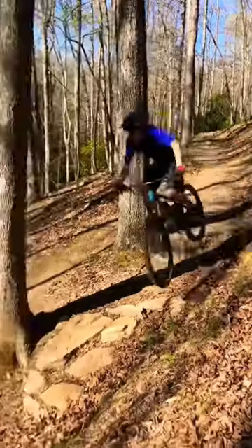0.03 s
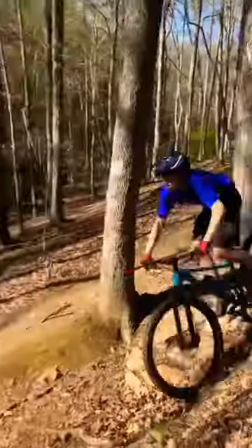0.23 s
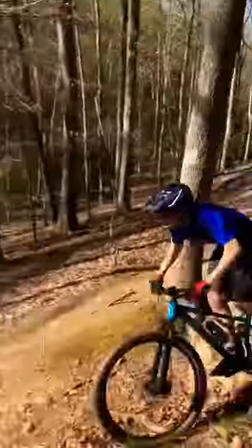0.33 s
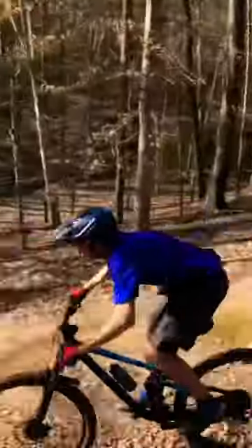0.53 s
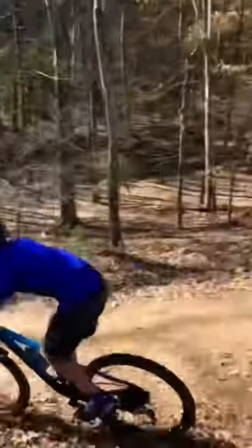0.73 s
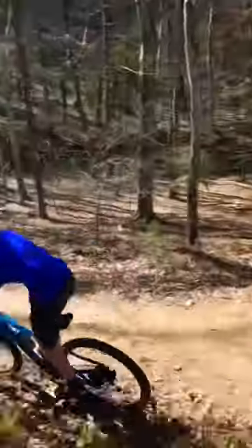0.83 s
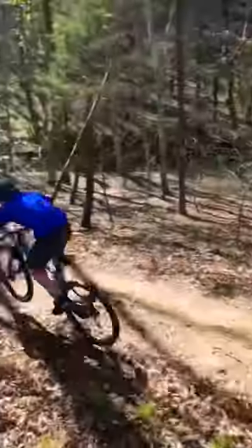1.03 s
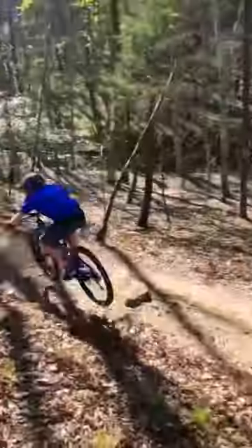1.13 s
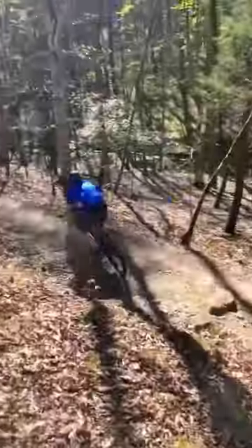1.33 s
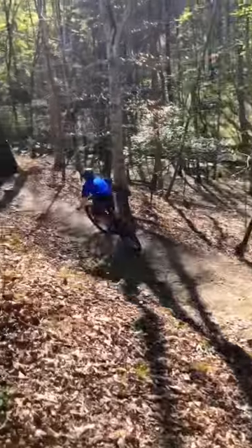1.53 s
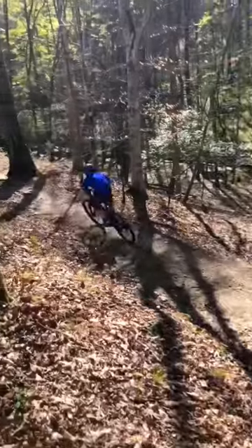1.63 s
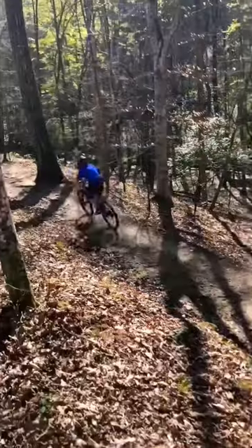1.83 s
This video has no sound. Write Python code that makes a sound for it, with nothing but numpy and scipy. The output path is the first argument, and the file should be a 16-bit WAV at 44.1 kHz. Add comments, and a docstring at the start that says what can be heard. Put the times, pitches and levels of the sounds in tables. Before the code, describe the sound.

A mountain bike ticks briefly in the air, lands with a thud and rushes close past, its tyres crunching through dry leaves and twigs. The frame knocks and the chain slaps, then it fades through a quiet wood, freehub buzzing.

```python
"""A mountain bike comes off a drop in a quiet wood, its freehub pawls ticking as the rear wheel spins.
At about 0.25 s it lands in dry leaves: the wheels thud, the tyres boom and the frame knocks.
It rushes past on a dirt trail, the tyres tearing through litter and grit, droning and snapping twigs,
while the chain slaps and the trees scatter a thin echo. From about 1 s it rides away through a bend,
duller and fainter, the freehub buzzing."""
import sys
import numpy as np
from scipy import signal
from scipy.fft import rfft, irfft, next_fast_len
from scipy.io import wavfile
from scipy.ndimage import map_coordinates

SR = 44100
rng = np.random.default_rng(int(sys.argv[2]) if len(sys.argv) > 2 else 0)


def master(y):
    """Save y as 16-bit WAV."""
    cut = np.clip(np.atleast_2d(y).T, -1, 1)
    pcm = np.round(cut * 32767)  # scale
    wavfile.write(sys.argv[1], SR, pcm.astype(np.int16))


N = 83790
T = np.arange(N) / SR

# Spectra of the noise sources. Each row: frequency in Hz, relative spectral density in dB.
WOOD_SPECTRUM = [(30, -51), (160, -0.5), (300, -20.5), (600, -2), (1200, -6.5), (2800, -14.5), (5000, -20),
                 (15000, -25)]
RUMBLE_SPECTRUM = [(20, -28), (40, -11.5), (60, -2.5), (90, -3.5), (130, -11.5), (220, -44), (800, -86)]
TICK_SPECTRUM = [(800, -3), (2200, -2), (2800, 2), (3600, 0), (5000, -6.5), (6600, -3), (7200, -3),
                 (8000, -3), (9200, -4), (13000, -3), (14200, 1), (16000, -4.5)]
BUZZ_SPECTRUM = [(1500, -9), (2800, -3), (4300, 8), (6000, 0.5), (8000, 2), (10000, 0), (12000, 2),
                 (13400, 8), (14300, -8), (15500, 7)]
DRONE_SPECTRUM = [(60, -12), (130, -6), (190, -3), (240, -5), (300, -3), (350, -11), (450, -14.5),
                  (900, -17.5), (4000, -92)]
LEAF_SPECTRUM = [(400, -8), (1200, -3), (2500, -2.5), (4000, -1), (7500, -0.5), (11000, -1), (15500, -3.5)]
NEAR_SOIL_SPECTRUM = [(200, -5), (500, -11.5), (780, 6), (1000, -1.5), (1250, -5), (1600, -1), (2600, -9),
                      (5000, -1), (15000, -45)]
FAR_SOIL_SPECTRUM = [(200, -40), (420, -16), (630, 3), (880, -8.5), (1130, 1.5), (1450, -5.5), (2200, -4),
                     (5000, -18), (15000, -48)]

# Envelopes of the sustained sounds. Each row: time in seconds, relative level in dB.
RUMBLE_LEVELS = [(0, -58), (.22, -70), (.3, -41), (.42, -33.5), (.49, -37.5), (.56, -47), (.65, -54),
                 (.75, -47.5), (.97, -47), (1.08, -51), (1.28, -59), (1.34, -50), (1.55, -55), (1.9, -60.5)]
DRONE_LEVELS = [(0, -52), (.22, -57.5), (.25, -45.5), (.37, -32.5), (.46, -40), (.7, -49.5), (.85, -45.5),
                (.97, -50), (1.12, -55.5), (1.28, -54), (1.35, -48.5), (1.41, -47.5), (1.6, -53),
                (1.7, -54.5), (1.9, -53.5)]
CAVITY_LEVELS = [(0, -60), (.22, -65), (.25, -48), (.37, -34), (.48, -52), (.62, -48), (.85, -49),
                 (1.0, -45), (1.07, -46), (1.12, -60), (1.28, -67), (1.35, -44.5), (1.42, -55.5),
                 (1.6, -52.5), (1.7, -59.5), (1.9, -62)]
LEAF_LEVELS = [(.2, -73), (.218, -38.5), (.232, -30.5), (.246, -26.5), (.278, -39.5), (.292, -31.5),
               (.312, -31.5), (.332, -22.5), (.366, -30), (.46, -31), (.498, -33), (.53, -25.5),
               (.575, -28), (.615, -30), (.675, -30.5), (.714, -29.5), (.766, -33), (.788, -28),
               (.846, -27), (.9, -31), (1.0, -32), (1.2, -50.5), (1.29, -48.5), (1.33, -46.5),
               (1.54, -50.5), (1.65, -52), (1.9, -56)]
SOIL_LEVELS = [(.2, -64), (.28, -40), (.335, -35), (.398, -36), (.42, -41), (.68, -43), (.85, -39),
               (1.0, -42), (1.12, -51), (1.21, -56), (1.297, -57), (1.32, -46), (1.41, -48), (1.55, -46),
               (1.68, -53), (1.9, -55)]
# The coasting freehub. Each row: time in seconds, clicks per second, level in dB.
FREEHUB_BUZZ = [(1.0, 62.5, -56), (1.15, 65, -49), (1.28, 66, -55), (1.34, 72, -44.5), (1.42, 92, -49),
                (1.6, 86, -54), (1.74, 93, -55), (1.9, 63, -54)]

# Single impacts. Each row: start in seconds, level in dB.
PAWL_TICKS = [(.005, -42), (.024, -49), (.054, -49), (0.0835, -46), (0.123, -47), (.1618, -47), (.205, -49)]
CHAIN_SLAPS = [(0.3931, -23), (1.371, -30)]
TYRE_BUMPS = [(.241, -24.5), (0.353, -32), (.368, -32), (.901, -29.5), (0.939, -30.5), (.986, -32),
              (1.013, -30), (1.157, -42.5), (1.328, -36), (1.343, -29), (1.444, -27), (1.472, -45)]
# Wheels striking the earth. Each row: start in seconds, level in dB, final pitch in Hz.
WHEEL_THUDS = [(.246, -12, 70), (.405, -28, 112), (.464, -18, 55), (.62, -34, 80)]
# Blows to the frame. Each row: start in seconds, level in dB, pitch in Hz, T60 in seconds.
FRAME_KNOCKS = [(.2395, -26, 740, .035), (.26, -30, 1650, .035), (.290, -35, 738, .03),
                (.329, -27, 580, .045), (.3718, -13, 1500, .015), (.538, -35, 1500, .03),
                (.638, -33, 800, .035), (.903, -32, 740, .03), (.930, -27, 750, .035),
                (1.074, -37, 720, .035), (1.158, -43, 700, .04), (1.3015, -34, 580, .028),
                (1.321, -38, 640, .03), (1.344, -31, 660, .03), (1.447, -31, 570, .035),
                (1.46, -35, 650, .04), (1.522, -39, 700, .035)]
# Twigs and stones cracking. Each row: start in seconds, level in dB, length in seconds, pitch in Hz.
TWIG_SNAPS = [(0.3526, -15.5, 0.013, 7000), (0.3902, -11, .014, 3180), (0.639, -21, 0.014, 6060),
              (0.867, -16, 0.0075, 3870), (0.91, -23.5, 0.014, 7840), (1.078, -34, 0.036, 4030),
              (1.259, -36, .012, 6030), (1.3688, -25.5, 0.016, 3170), (1.443, -33.5, 0.012, 7000),
              (1.515, -36, 0.044, 4900), (1.609, -30, 0.011, 2980), (1.673, -32.5, 0.022, 11900),
              (1.762, -45, .02, 5000)]

# Normal modes. Each row: frequency in Hz, relative level in dB, T60 in seconds.
CHAIN_MODES = [(2805, -5, 0.037), (3113, -1.5, 0.04), (3280, 0, 0.024), (4080, -2, 0.017),
               (5780, -3, 0.026), (7760, -7.5, 0.056)]
TYRE_MODES = [(133.5, -9, 0.09), (197, -3.5, 0.049), (253, 3.5, 0.032), (293.1, -3.5, 0.14),
              (583, -12, 0.12), (720, -13, 0.091)]


def amp(db):
    """Amplitude grows tenfold with every 20 dB."""
    return 10 ** (np.asarray(db) / 20)


def unit(x):
    """Normalisation to an rms of 1."""
    return x / np.sqrt(np.mean(x ** 2) + 1e-20)


def level(rows):
    """Gain interpolated in decibels between (s, dB) points."""
    return amp(np.interp(T, *np.transpose(rows)))


def noise():
    """White noise: independent Gaussian samples."""
    return rng.standard_normal(N)


def wobble(per_s):
    """Smooth random modulation: a spline through per_s knots a second."""
    return map_coordinates(rng.standard_normal(1024), [T * per_s], mode="wrap")


def filtered(x, response):
    """A linear filter multiplies the spectrum by its frequency response."""
    size = next_fast_len(N + SR // 2)
    return irfft(rfft(x, size) * response(np.fft.rfftfreq(size, 1 / SR)), size)[:N]


def coloured(x, spectrum):
    """Spectral shaping by (Hz, dB) points, at rms 1."""
    f, db = np.transpose(spectrum)
    return unit(filtered(x, lambda hz: amp(np.interp(np.log(hz + 1), np.log(f), db))))


def resonant(x, hz, q):
    """Forced response of a damped oscillator, at rms 1."""
    return unit(filtered(x, lambda f: 1j * f / (hz * hz - f * f + 1j * f * hz / q)))


def noise_band(hz, q):
    """Two equal resonances in cascade confine noise to a band."""
    return resonant(resonant(noise(), hz, q), hz, q)


def blow(start, rise_s, t60):
    """Impact envelope: a quick rise, then exponential decay by 60 dB in t60 seconds."""
    age = np.maximum(T - start, 0)
    return (1 - np.exp(-age / rise_s)) * amp(-60 * age / t60)


def grit(per_s, spread_db, share):
    """Shot noise: tiny random fractures carry a share of the power, and hiss the rest."""
    impulses = (rng.random(N) < per_s / SR) * np.sign(noise())
    sizes = amp(spread_db * np.minimum(rng.exponential(size=N), 5))
    return np.sqrt(share) * unit(impulses * sizes) + np.sqrt(1 - share) * noise()


def wood_hush():
    """The ambient sound of the wood is faint stationary noise."""
    return amp(-57) * coloured(noise(), WOOD_SPECTRUM)


def tree_echo(x):
    """Scattering from trunks acts as convolution with a decaying noise tail."""
    tail = coloured(noise(), [(300, -4), (3000, -19), (15000, -10)])
    tail *= blow(0.0045, rise_s=0.0083, t60=0.68)
    return amp(-17.5) * signal.fftconvolve(x, tail / np.linalg.norm(tail))[:N]


def ground():
    """Earth and moving air rumble; each wheel thud is a damped oscillation of sinking pitch."""
    overshoot, sink_s = 0.6, 0.01
    out = level(RUMBLE_LEVELS) * coloured(noise(), RUMBLE_SPECTRUM)
    for start, db, hz in WHEEL_THUDS:
        age = np.maximum(T - start, 0)
        cycles = hz * (age + overshoot * sink_s * (1 - np.exp(-age / sink_s)))
        out += amp(db) * blow(start, rise_s=0.012, t60=0.1) * np.sin(2 * np.pi * cycles)
    return out


def freehub_ticks():
    """Each pawl impact excites a broadband transient while the wheel spins in the air."""
    ticks = sum(amp(db) * blow(start, rise_s=0.0005, t60=0.04) for start, db in PAWL_TICKS)
    return ticks * coloured(noise(), TICK_SPECTRUM)


def freehub_buzz():
    """Pawls on the ratchet form a pulse train whose rate is set by the wheel's speed."""
    times, rates, db = np.transpose(FREEHUB_BUZZ)
    rise_s, t60 = 0.00035, 0.014
    rate = np.interp(T, times, rates)
    since_click = (np.cumsum(rate) / SR + rng.random()) % 1 / rate
    clicks = unit((1 - np.exp(-since_click / rise_s)) * amp(-60 * since_click / t60))
    gain = amp(np.interp(T, times, db, left=-120) + 2.2 * wobble(per_s=60))
    return gain * clicks * coloured(noise(), BUZZ_SPECTRUM)


def chain():
    """Steel links slap the frame and ring in their modes; phase jitter broadens each line."""
    out = np.zeros(N)
    for start, db in CHAIN_SLAPS:
        for hz, mode_db, t60 in CHAIN_MODES:
            envelope = amp(db + mode_db + rng.normal()) * blow(start, rise_s=0.0004, t60=t60)
            out += envelope * np.sin(2 * np.pi * hz * (T - start) + 0.8 * wobble(per_s=450))
    return out


def frame_knocks():
    """Heavy damping makes the struck frame clack: a short ring inside a rattle."""
    out = np.zeros(N)
    for start, db, hz, t60 in FRAME_KNOCKS:
        ring = np.sin(2 * np.pi * hz * (T - start))
        rattle = noise_band(hz, q=1.6)
        out += amp(db) * blow(start, rise_s=0.00062, t60=t60) * (0.8 * ring + 0.9 * rattle)
    return out


def tyres():
    """Loaded casings drone, the enclosed air resonates, and bumps excite the tyres' normal modes."""
    drone = level(DRONE_LEVELS) * coloured(noise(), DRONE_SPECTRUM)
    cavity = level(CAVITY_LEVELS) * noise_band(hz=304.2, q=6)
    booms = np.zeros(N)
    for start, db in TYRE_BUMPS:
        for hz, mode_db, t60 in TYRE_MODES:
            detune, strength = rng.standard_normal(2)
            envelope = amp(db + mode_db + 1.3 * strength) * blow(start, rise_s=0.0027, t60=t60)
            booms += envelope * np.sin(2 * np.pi * hz * (1 + 0.027 * detune) * (T - start))
    return drone + cavity + booms


def twig_snaps():
    """Brittle fracture releases a short splintering burst with one broad resonance."""
    out = np.zeros(N)
    for start, db, length, hz in TWIG_SNAPS:
        burst = noise()
        crack = 0.87 * coloured(burst, LEAF_SPECTRUM) + 0.52 * resonant(burst, hz, q=3)
        out += amp(db) * blow(start, rise_s=0.0018, t60=1.76 * length) * crack
    return out


def tearing():
    """Fracture and friction: knobs crush leaves and scrub soil, modulated by their fluttering grip."""
    grounded = np.clip((T - 0.2) / 0.0078, 0, 1)
    grip = amp(1.63 * wobble(per_s=110))
    crackle = grit(per_s=8000, spread_db=2.5, share=0.52)
    leaves = amp(1) * level(LEAF_LEVELS) * coloured(crackle, LEAF_SPECTRUM)
    crumbs = grit(per_s=1200, spread_db=3.5, share=0.53)
    far = np.interp(T, [0.98, 1.3], [0, 1])  # the scrub dulls as the bike rides away
    scrub = (1 - far) * coloured(crumbs, NEAR_SOIL_SPECTRUM) + far * coloured(crumbs, FAR_SOIL_SPECTRUM)
    return grounded * grip * (leaves + level(SOIL_LEVELS) * scrub)


def scene():
    """Superposition of the bike, the ground, the bike's echo and the hush of the wood."""
    bike = freehub_ticks() + freehub_buzz() + tearing() + chain()
    bike += twig_snaps() + frame_knocks() + tyres()
    return (bike + ground() + tree_echo(bike) + wood_hush())[None]


def record(dry):
    """The microphone is a band-pass filter: a third-order bass roll-off and a sharp upper limit."""
    low_hz, top_hz = 23.4, 15850
    return filtered(dry[0], lambda hz: (hz < top_hz) * (1j * hz / (low_hz + 1j * hz)) ** 3)[None]


dry = scene()
out = record(dry)
master(out)
```